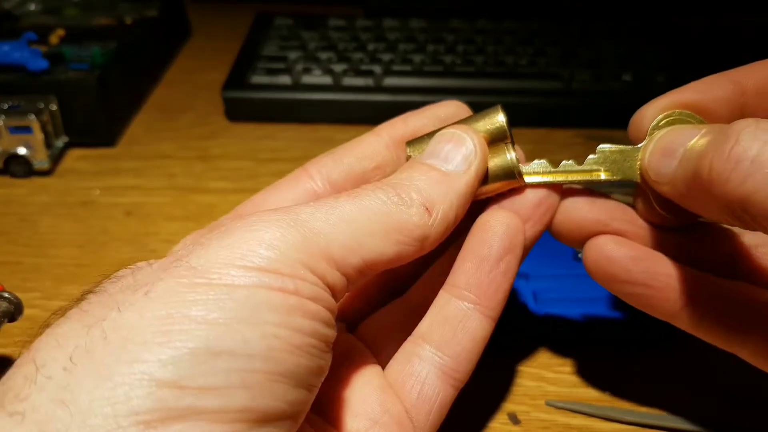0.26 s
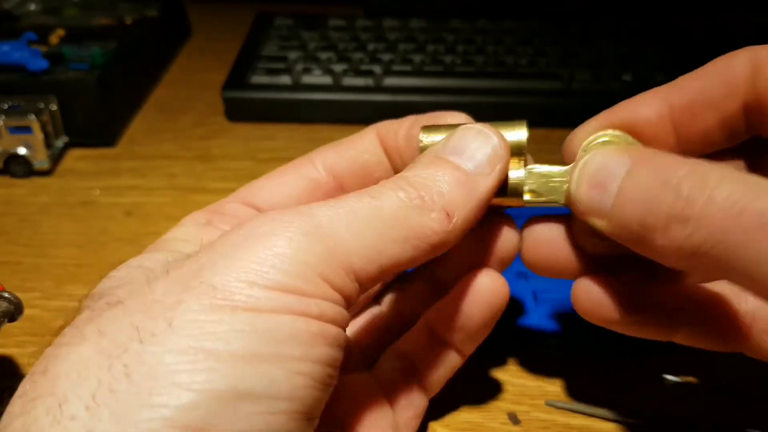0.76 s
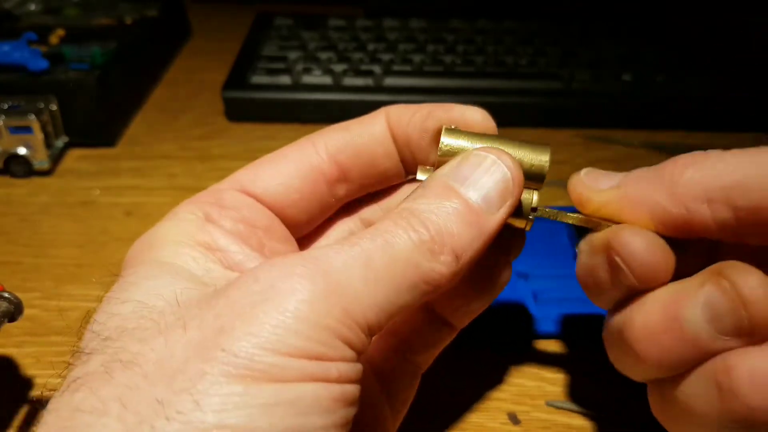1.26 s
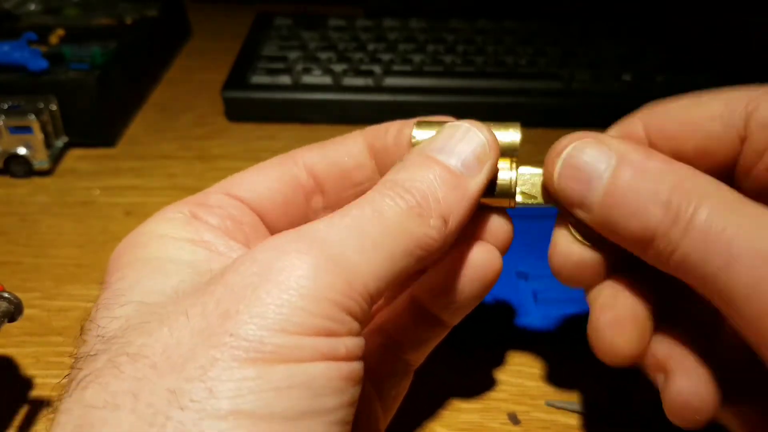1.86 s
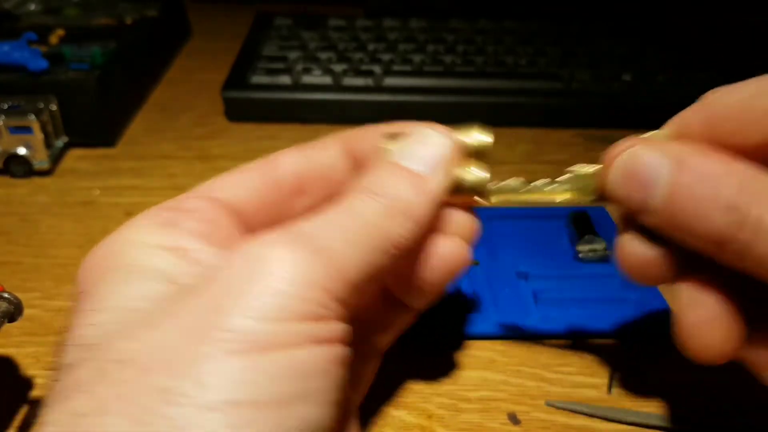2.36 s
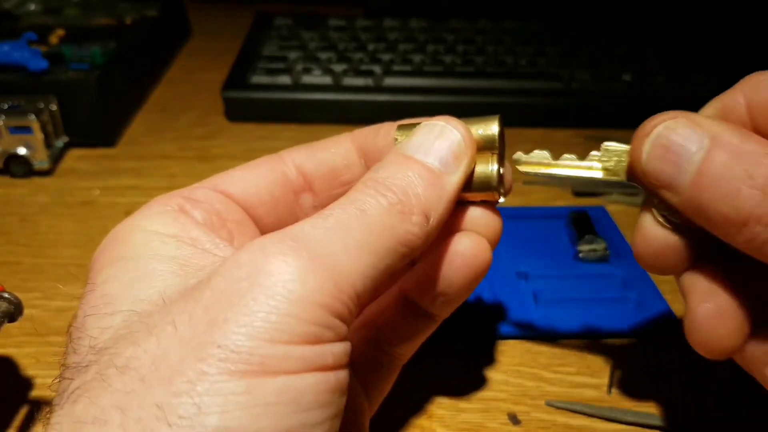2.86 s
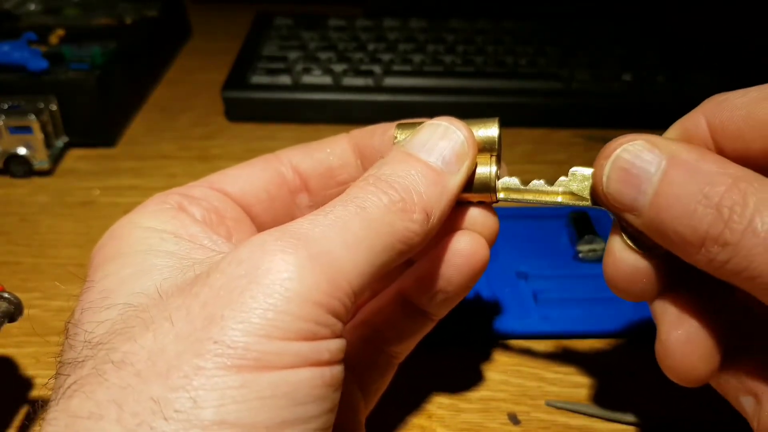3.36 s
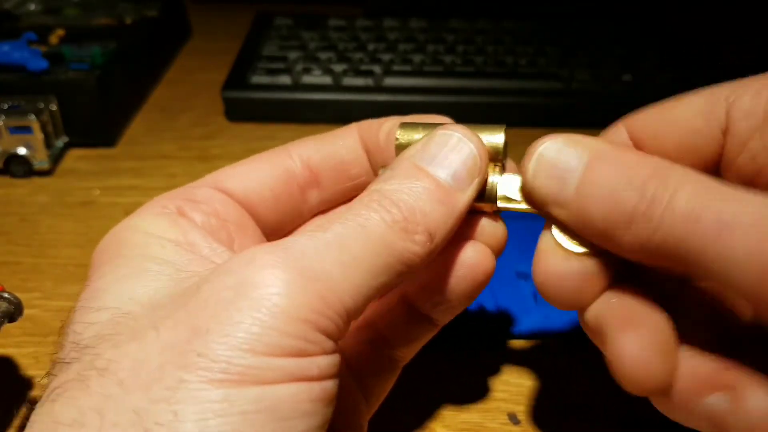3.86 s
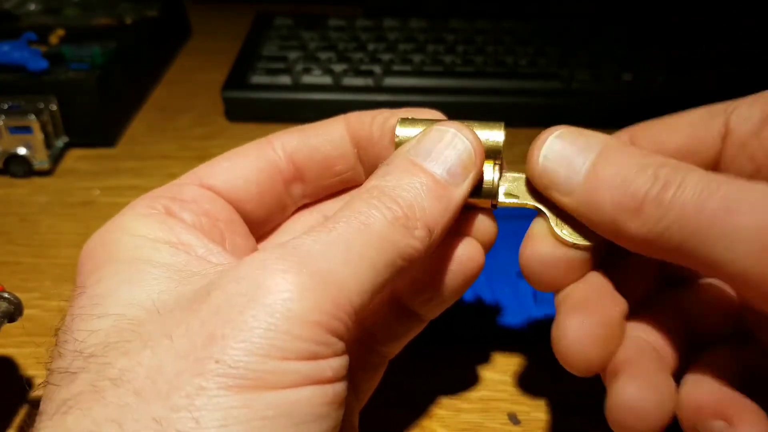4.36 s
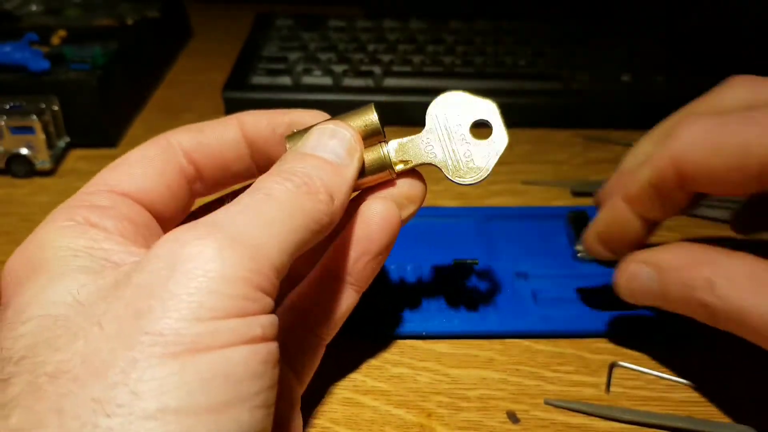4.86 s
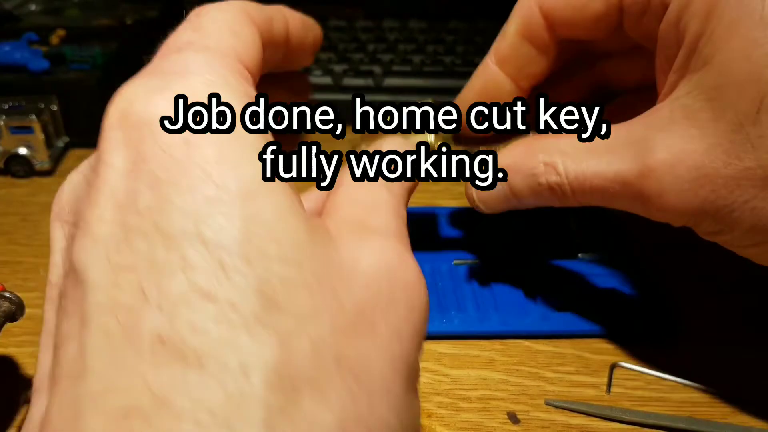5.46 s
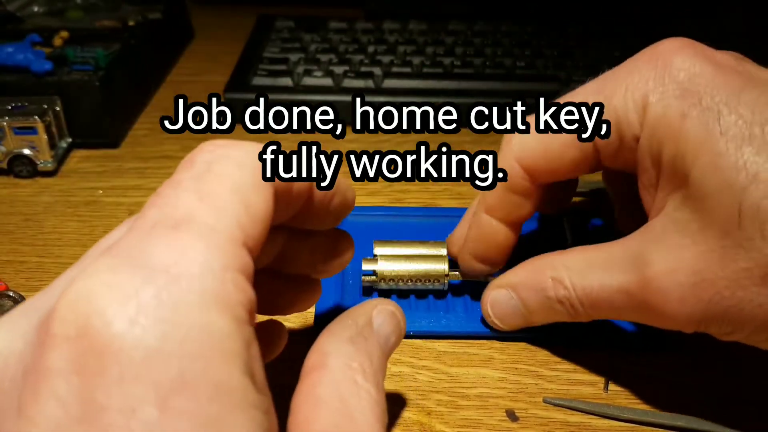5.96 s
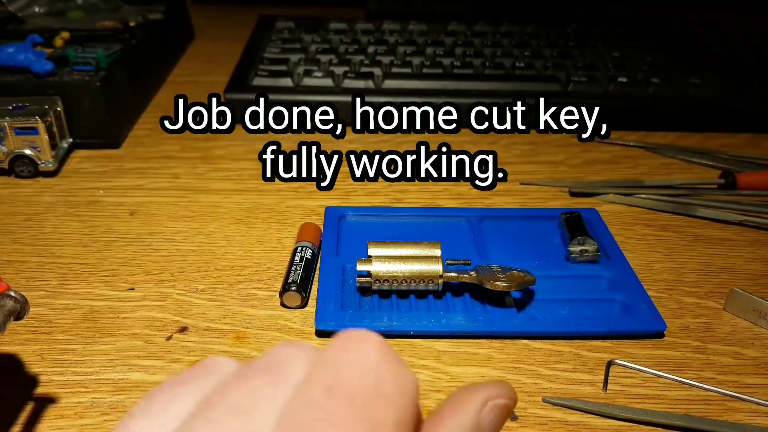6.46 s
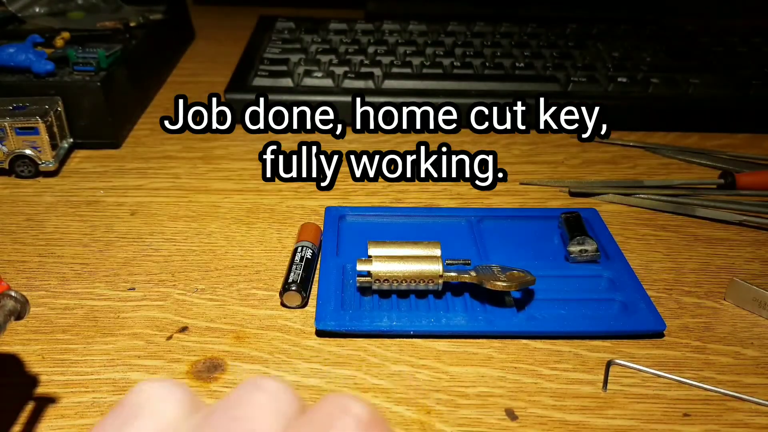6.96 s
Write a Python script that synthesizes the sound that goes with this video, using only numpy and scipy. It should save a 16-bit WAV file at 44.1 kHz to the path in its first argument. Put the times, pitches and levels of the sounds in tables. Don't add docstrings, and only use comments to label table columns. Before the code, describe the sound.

Dry, bright, gritty metal ticks, slightly left of centre: a key enters a cylinder, hits home sharply, turns with tiny clicks, rattles out over the pins, then repeats the insertion with an even sharper snap. Quiet loose-key jingles lead to a double knock on a hollow plastic tray, a wooden thud with a bright clack, and a final little tumble. A short room reflection answers the hits, above wavering low hum, soft bumps and hiss.

```python
import sys
import numpy as np
from scipy import signal
from scipy.fft import rfft, irfft
from scipy.io import wavfile
from scipy.ndimage import uniform_filter1d

SR = 44100
rng = np.random.default_rng(int(sys.argv[2]) if len(sys.argv) > 2 else 0)


def attenuation_scalar(level_db):
    decades = np.asarray(level_db, float) / 20
    return 10 ** decades


def unload_wav(signal):
    wavfile.write(
        sys.argv[1],
        SR,
        np.round(np.clip(np.atleast_2d(signal).T, -1, 1) * 32767).astype(np.int16),
    )


N = 317520

# (time [s], peak [dB], dullness [dB], chatter length [ms])
TOUCHES = [
    (.3016, -55.5, -4, 3.3),
    (.3153, -66, -18, 6),
    (.3282, -58, -4, 2.1),
    (.4114, -53, -7, 2.5),
    (.4196, -42.5, -13, 2),
    (.4707, -34.5, -14.5, 1.1),
]
# (time [s], peak [dB], dullness [dB], chatter length [ms])
FIRST_IN = [
    (.6591, -25.5, -22, 1.6),
    (.6614, -29, -30.5, 2),
    (.755, -40.5, -21, 2.3),
    (.7592, -28, -14.5, 5.1),
    (.7665, -26, -12.5, 1.1),
    (.7686, -17, -19.5, 2.3),
]
# (time [s], peak [dB], dullness [dB], chatter length [ms])
SEATED = [
    (.8725, -29, -15, 2.8),
    (.8768, -23, -15, 3),
    (.8845, -6.5, -14.5, 1.1),
    (.8865, -26, -18, 3.5),
    (3.7635, -29.5, -10, 4),
    (3.768, -23, -11.5, 1.8),
    (3.7737, -4, -10.5, 0.43),
    (3.7755, -18, -13, 3.5),
]
# (time [s], peak [dB], dullness [dB], chatter length [ms])
TURNS = [(1.2015, -45, -22.5, 4.3), (1.209, -46, -14, 3), (1.2184, -48, -5.5, 2.7), (1.339, -61, -14, 3.3),
         (1.4751, -51, -15.5, 1), (1.578, -47, -13, 2), (1.5817, -38.5, -10, 2.2), (1.588, -48.5, -8, 5.6),
         (1.7664, -56, 7, 3.4), (1.7777, -46, -7.5, 2.2), (1.7871, -52.5, 0, 7.1), (1.7939, -51, -11, 4.3),
         (1.8016, -44, -6, 2.4), (1.9853, -40, -11, 6.1), (1.9915, -34.5, -18.5, 0.86),
         (3.9587, -56, -2, 14), (3.9843, -39, -19, 2.6), (4.0078, -49.5, -5, 9.6), (4.1451, -57.5, -9, 2.8),
         (4.2095, -45.5, -6, 6.5), (4.2156, -42.5, -2, 3.7), (4.2237, -41.5, -10.5, 2.5),
         (4.229, -53, 8.5, 6), (4.377, -60.5, 3.5, 4.9), (4.3894, -59, -0.5, 14), (4.398, -47, -8.5, 6.6),
         (4.4854, -48, -13, 1.9), (4.491, -44.5, -11, 2.6)]
# (time [s], peak [dB], dullness [dB], chatter length [ms])
STOPS = [
    (1.4813, -36, -17, 1.6),
    (1.9154, -38.5, -15, 1.53),
    (4.1546, -39, -17.5, 1.6),
]
# (time [s], peak [dB], dullness [dB], chatter length [ms])
KEY_OUT = [(2.4236, -39.5, -16, 2.97), (2.4268, -41.5, -11, 2), (2.4299, -31.5, -8, 2.2),
           (2.435, -27.5, -16, 2.5), (2.4375, -30, -22, 2), (2.4395, -24, -9.5, 3.48),
           (2.4656, -26.5, -16.5, 2), (2.4719, -25, -27.5, 1.8), (2.4768, -22, -20, 2.2),
           (2.4828, -17.5, -20, 2.5), (2.488, -22, -24, 1.6), (2.4915, -28, -22, 3),
           (2.5025, -36, -18, 2.5)]
# (time [s], peak [dB], dullness [dB], chatter length [ms])
KEY_IN = [(3.173, -60, 6, 6.5), (3.249, -61, 4, 3.3), (3.2546, -54.5, -5.5, 4.3), (3.2703, -58, 3.5, 8.3),
          (3.2947, -60, 3.5, 11.5), (3.3075, -49.5, -20.5, 2.2), (3.3374, -55, -14, 4.5),
          (3.4305, -58.5, -11, 1.9), (3.6325, -29.5, -26, 2.7), (3.6352, -33.5, -11, 2.1),
          (3.6525, -23.5, -24, 2.6), (3.6548, -28.5, -18, 1.7), (3.668, -30.5, -18, 0.85),
          (3.67, -19.5, -16.5, 2.6)]
# (time [s], peak [dB], dullness [dB], chatter length [ms])
RATTLE = [(4.5966, -37.5, -20.5, 2.1), (4.6088, -46.5, -5, 7.7), (4.6753, -39.5, -13.5, 5.4),
          (4.6879, -35.5, -12.5, 1.14), (5.0649, -54, -15, 7.1), (5.1212, -51.5, -14, 12.3),
          (5.3893, -55, -18, 2.4), (5.4575, -53.5, -5, 2.3), (5.5464, -49.5, -3, 4.4),
          (5.5514, -51.5, -12.5, 3), (5.5561, -40.5, -12.5, 2.8), (5.56, -45, -10, 3),
          (5.571, -48, -11, 4.2)]
# (time [s], pitch [Hz], level [dB])
RINGS = [(.66, 5980, 5.5), (.7686, 12820, 8), (.7686, 2300, 4.5), (.8845, 8260, 7.5), (1.205, 3020, 16.5),
         (1.2184, 3000, 7), (1.5817, 4040, 10), (1.5817, 6070, 18), (1.7664, 2400, 17.5),
         (1.7777, 9400, 10), (1.8016, 7860, 14), (1.9915, 9400, 9), (2.4832, 4880, 11), (2.4832, 11100, 6),
         (3.632, 9740, 7), (3.67, 2400, 6), (3.67, 3996, 2.5), (3.67, 9430, 10), (3.7737, 750, 6),
         (3.7737, 9600, 5), (4.2156, 10100, 20), (4.2156, 744, 10.5), (4.49, 5030, 12)]
RING_HZ, RING_S = 330, 0.004

# (time [s], thud peak [dB], clack [dB], treble [dB], contact length [ms])
TRAY_KNOCKS = [(5.885, -37, -9, -6.5, 5.8), (5.891, -32, -4, -25, 2.8), (5.897, -36.5, -15.5, -8.5, 3.9),
               (5.912, -43, -32.5, -2, 4.6), (6.045, -50.5, -19, 0, 9.5), (6.07, -26, -11, -10.5, 5.4),
               (6.0828, -13.5, 3.5, 1.5, 1.4), (6.0845, -11.5, -4, -3.5, 2.2), (6.0875, -21, -11, -13, 2.2),
               (6.093, -24, -3.5, -12, 2), (6.101, -28.5, -10.5, -13.5, 3), (6.113, -27, -14, -14, 5.1),
               (6.144, -30.5, -14, -19.5, 4), (6.16, -35.5, -42, 2.5, 4.4), (6.195, -48, -3, -17.5, 6.4)]
# (time [s], thud peak [dB], clack [dB], treble [dB], contact length [ms])
CLACKS = [
    (6.585, -55, -10, -28, 9.5),
    (6.6195, -24.5, -7.5, -40, 1.3),
    (6.6225, -20, -16, -38, 4.1),
    (6.6355, -34.5, 25, 15, 2.5),
    (6.6388, -32.5, 17.5, 11.5, 1.14),
    (6.65, -40.5, 14, 8.5, 8.2),
    (6.665, -30.5, 10, -4, 3.7),
    (6.671, -26.5, -1, -9, 4.9),
    (6.68, -30.5, -13, -11.5, 2.6),
    (6.705, -36.5, 6, -6.5, 17),
]
# (time [s], thud peak [dB], clack [dB], treble [dB], contact length [ms])
TUMBLE = [(7.005, -37.5, 7.5, -12.5, 3.2), (7.012, -37, 15, -16, 8.9), (7.018, -39.5, 12, -15, 6.4),
          (7.033, -36.5, 3.5, -17, 5), (7.046, -40.5, 2, -16, 11), (7.058, -26, 5.5, 2, 3.1),
          (7.061, -26, 7, 2.5, 1.6), (7.07, -37, -5, 0, 4), (7.081, -36.5, -11, 3, 10),
          (7.1005, -43, -9, 12, 2.8), (7.104, -29.5, -19, 3, 2.3), (7.108, -24.5, 10.5, -30, 2.1),
          (7.113, -31, -4, -15, 3), (7.129, -26.5, -8, -31, 4.1), (7.143, -27.5, -17, -13, 3.5),
          (7.156, -30, -8, -25, 2.7), (7.164, -36.5, -11, 6.5, 4.3), (7.168, -33.5, 9, -8, 3.3),
          (7.187, -34, -5, -11, 4.5)]
# (time [s], pitch [Hz], level [dB])
SPOTS = [(5.891, 865, 0.5), (6.0845, 785, 7.5), (6.0875, 761, 0.5), (6.0845, 1250, -0.5),
         (6.6225, 875, 6.5), (6.6388, 3400, 6.5), (6.6388, 4730, 10), (7.018, 2610, 10), (7.061, 1400, 7.5),
         (7.108, 1020, 0.5), (7.168, 1440, 7), (7.058, 12500, -2), (7.061, 12300, -3), (7.1005, 12300, 12),
         (7.1005, 14000, 10), (7.104, 12300, 12), (7.164, 12500, 14.5), (7.164, 14300, 8),
         (7.168, 12800, 10), (6.65, 12700, 11), (6.665, 12700, 8), (6.6195, 1500, 9), (6.6195, 2000, 9.5),
         (6.6195, 1200, 4)]
SPOT_HZ, SPOT_SHARE = 149.9, 0.079
CRACK_SHARE, CRACK_DB = 0.72, 0

# (pitch [Hz], width [Hz], level [dB])
BRASS = [(2500, 420, -1.5), (3677, 780, -0.5), (6250, 1300, 4), (9300, 310, -4.5), (10800, 670, -6),
         (13900, 260, 8)]
# (pitch [Hz], width [Hz], level [dB])
BARREL = [(741, 140, 6.5), (1600, 340, -1.5)]
# (pitch [Hz], width [Hz], level [dB])
PLUG = [(2700, 810, -4), (4000, 1400, 8), (5750, 620, 8.5), (9130, 1260, 9), (11600, 740, -5),
        (14140, 420, 3.5)]
# (pitch [Hz], width [Hz], level [dB])
STOP_RING = [(4000, 940, 16.5), (5150, 900, 4), (8610, 880, 11), (9600, 720, 10), (10700, 600, 0.5),
             (14300, 800, 0)]
# (pitch [Hz], width [Hz], level [dB])
FACE = [(1520, 76, 18), (3004, 210, -5), (9600, 510, -1), (13000, 1500, 1.5)]
# (pitch [Hz], width [Hz], level [dB])
KEY_BOW = [(3250, 378, -2), (4570, 520, 5), (5760, 400, 8), (11700, 900, 0), (13570, 570, 5)]
# (pitch [Hz], width [Hz], level [dB])
TRAY = [(235, 31, 15), (345, 15, 6.7), (465.3, 46, 9.5), (579, 53, 4.6), (686, 46, 5.1), (790.6, 61, 8),
        (1120, 72, 4.6), (1317, 240, 3), (2110, 140, 2), (2464, 200, -2), (2680, 200, 3.6), (3424, 340, 3),
        (4565, 570, 3)]
# (pitch [Hz], width [Hz], level [dB])
BLOCK = [(851, 56, 8.5), (1027, 84, 7.5), (1482, 83, 3), (1805, 140, 0), (2110, 54, -4), (2830, 100, 2.5),
         (3315, 190, 8), (3650, 130, 3.5), (4200, 120, 5.5), (4620, 230, 6), (5270, 87, -7)]
# (pitch [Hz], width [Hz], level [dB])
TOOL = [(460, 48, 15.5), (635, 43, 3.5), (920, 97, 1.5), (1083, 130, 6), (1400, 140, 3.5), (2585, 100, 8.5),
        (2940, 120, 6), (4163, 340, 3), (5220, 220, 0.5), (6650, 220, -3)]
WANDER_DB, BODY_PER_DB = 4, -0.2413
DIP_HZ, DIP_OCTAVES, DIP_DB = 7140, 0.39, -3.5

# (pitch [Hz], level [dB], T60 [s])
BOARDS = [(95, -6.5, 0.23), (136.5, 2.5, .55), (240, -7.5, 0.18), (335, -8, 0.63), (458, -8.5, .4)]
# (time [s], level [dB])
BOARD_BLOWS = [
    (5.904, -44),
    (6.09, -31.5),
    (6.63, -45.5),
    (7.058, -57),
]
BOARD_RISE_S = 0.025
# (time [s], level [dB], hold [s])
SHAKES = [
    (5.908, -31, 0.0057),
    (6.09, -33, 0.079),
    (6.64, -35.5, 0.009),
    (7.08, -40.5, 0.083),
]
SHAKE_RISE_DB_S, SHAKE_FALL_DB_S = 600.5, 148.5
# (frequency [Hz], density [dB per Hz])
SHAKE_COLOUR = [(80, -4), (105, 1), (124, -4), (138, 7), (154, -19.5), (232, -1.5), (290, -17), (335, 0),
                (400, -9.5)]

# (frequency [Hz], T60 [s])
ROOM_T60 = [(150, 0.7), (500, 0.36), (1400, 0.36), (3700, 0.29), (9000, 0.2), (15000, 0.23)]
# (frequency [Hz], level [dB])
ROOM_COLOUR = [(150, 1), (500, -4), (1400, 0.5), (3700, 0.5), (9000, 2), (15000, -2.5)]
ECHO_GRAIN_DB = 2.5
RING_SHARE = 0.4

# (time [s], level [dB], hold [s])
SCRAPE = [
    (3.05, -70, 0.0064),
    (3.15, -63, 0.011),
    (3.258, -63, 0.035),
]
SCRAPE_RISE_DB_S, SCRAPE_FALL_DB_S = 600, 215
# (frequency [Hz], density [dB per Hz])
SCRAPE_COLOUR = [(1900, -3.5), (2200, 1), (2450, -2.5), (2800, -15.5)]
# (time [s], level [dB], hold [s])
BUMPS = [(.08, -57, 0.0086), (.77, -45.5, 0.0051), (.88, -39, 0.0031), (1.55, -59, 0.011),
         (1.94, -54.5, 0.012), (2.43, -36.5, 0.051), (2.81, -55, 0.012), (3.59, -52.5, 0.09),
         (3.69, -45, 0.12), (4.13, -52.5, 0.02), (4.6, -49.5, 0.096), (5.17, -52.5, 0.02),
         (5.29, -52.5, 0.025), (5.55, -54, 0.15)]
BUMP_REST_DB, BUMP_RISE_DB_S, BUMP_FALL_DB_S = -64.5, 503, 351
# (frequency [Hz], density [dB per Hz])
BUMP_COLOUR = [(44, -27.5), (75, -3.5), (113, 1), (296, -15), (344, -24), (373, -20.5), (500, -25),
               (650, -56), (1100, -120)]
# (time [s], level [dB], hold [s])
JOLTS = [
    (.42, -67, .02),
    (.85, -63, 0.054),
    (2.38, -57.5, 0.028),
    (2.63, -61.5, 0.05),
    (3.69, -55, 0.072),
    (4.6, -48, 0.048),
    (5.17, -59, 0.029),
    (5.62, -52, 0.012),
]
JOLT_REST_DB, JOLT_RISE_DB_S, JOLT_FALL_DB_S = -73, 293, 150.5
# (frequency [Hz], density [dB per Hz])
JOLT_COLOUR = [(22, 3), (35, 2), (52, -12)]
# (time [s], level [dB], hold [s], pitch [Hz])
HUM = [(0.09, -52.5, 0.013, 58.46), (0.257, -55, 0.014, 62.96), (0.743, -49.5, 0.043, 63.41),
       (0.965, -50.5, 0.033, 65.1), (1.234, -49.5, 0.026, 61), (1.366, -53, 0.052, 64.69),
       (1.673, -49, 0.3, 65.45), (2.125, -48, 0.044, 60.13), (2.478, -49, 0.055, 61.78),
       (2.729, -50.5, 0.47, 61.39), (3.433, -48, 0.41, 62.85), (3.976, -47, .47, 63.63),
       (4.65, -56, 0.44, 64.34), (5.492, -58, 0.07, 64.16), (6.169, -55, 0.016, 62.66),
       (6.439, -53.5, 0.23, 68.66), (7.07, -48.5, 0.065, 67.74)]
HUM_REST_DB, HUM_RISE_DB_S, HUM_FALL_DB_S = -61, 131, 131
# (frequency [Hz], density [dB per Hz])
FLOOR = [(12, -34), (20, -13), (80, -1), (106, -6), (195, -18), (280, -18), (391, -33.5), (805, -30.5),
         (1220, -36), (1850, -31.5), (3140, -45), (5040, -45), (7640, -49), (11000, -37), (15300, -35.5)]
FLOOR_DB = -57

# (start [s], end [s], top [Hz])
DULLED = [
    (6.1, 6.15, 14600),
    (6.65, 6.72, 15000),
    (7.057, 7.074, 13000),
    (7.074, 7.12, 14600),
    (7.147, 7.162, 12500),
    (7.172, 7.186, 14500),
]
TOP_HZ, PEAK = 15400, 0.9
LEFT_LEAN = attenuation_scalar(np.array([[0.8], [-0.8]]))


def pins():
    return (ticks(KEY_IN, BRASS, body_db=-1.0, left_db=6.0, vary_db=-2.5)
            + ticks(SEATED, BRASS + BARREL, body_db=-1.5, left_db=1.5, vary_db=3.5, wander_db=-1.0)
            + ticks(TURNS, PLUG, body_db=5.5, left_db=4.5, vary_db=6.5)
            + ticks(KEY_OUT, BRASS + BARREL, body_db=4.5, left_db=3.0, vary_db=1.5)
            + ticks(RATTLE, KEY_BOW, body_db=-1.5, left_db=6.0, vary_db=0.0)
            + ticks(STOPS, STOP_RING, body_db=-1.5, left_db=4.5, vary_db=3.0)
            + ticks(TOUCHES, FACE, body_db=-4.5, left_db=4.5, vary_db=-0.5)
            + ticks(FIRST_IN, BRASS, body_db=-7.0, left_db=3.0, vary_db=7.5))


def ticks(events, modes, body_db, left_db, vary_db, wander_db=WANDER_DB):
    def colour_db(hz, row):
        time, peak_db, dullness_db = row[:3]
        octaves = np.log2((hz + 1) / DIP_HZ)
        dip = DIP_DB * np.exp(-(octaves / DIP_OCTAVES) ** 2)
        middle = (dullness_db + 3) * (1 - above(hz, 10000, 5.4))
        low = (body_db + BODY_PER_DB * (peak_db + 40)) * (1 - above(hz, 2000, 6))
        ring = sum(db * np.exp(-((hz - f) / RING_HZ) ** 2)
                   for s, f, db in RINGS if abs(s - time) < RING_S)
        return ring + middle + low + dip - 10 * (1 - above(hz, 250, 2.3))

    pan_db = left_db + wander_db * rng.standard_normal(len(events))
    return strike(events, colour_db, pan_db, modes, (2500, 16000), rise=0.3, fall=0.77, grit_db=7.0,
                  vary_db=vary_db, even_hz=1491, push_hz=1500, alike_hz=2556, lag_s=0.0001,
                  blur_hz=1800, size=2048, lead=700)


def knocks():
    return (blows(TRAY_KNOCKS, TRAY, left_db=4.0, top_db=3.5, top_hz=13000, vary_db=-1.5)
            + blows(CLACKS, BLOCK, left_db=4.5, top_db=-7.5, top_hz=12700, vary_db=2.5)
            + blows(TUMBLE, TOOL, left_db=3.5, top_db=-11.5, top_hz=13700, vary_db=-1.0))


def blows(events, modes, left_db, top_db, top_hz, vary_db):
    def colour_db(hz, row):
        time, _, clack_db, treble_db = row[:4]
        crack_db = clack_db + CRACK_SHARE * (treble_db - clack_db) + CRACK_DB
        db = (clack_db - 2.5) * above(hz, 1000, 8)
        db = db + (crack_db - clack_db - 6) * above(hz, 2400, 8)
        db = db + (treble_db - crack_db - 2) * above(hz, 5300, 6)
        db = db + sum(g * np.exp(-((hz - f) / max(SPOT_HZ, SPOT_SHARE * f)) ** 2)
                      for s, f, g in SPOTS if abs(s - time) < RING_S / 2)
        tilt = top_db * above(hz, top_hz, 4.9) - 7 * above(hz, 6400, 2.5)
        return db + tilt - 14 * (1 - above(hz, 407.3, 2.01))

    pan_db = np.full(len(events), left_db)
    return strike(events, colour_db, pan_db, modes, (400, 1000), rise=0.025, fall=1.0, grit_db=7.0,
                  vary_db=vary_db, even_hz=341.6, push_hz=253.5, alike_hz=1812, lag_s=0.00027,
                  blur_hz=600, size=8192, lead=400)


def strike(events, colour_db, pan_db, modes, band_hz, rise, fall, grit_db, vary_db, even_hz, push_hz,
           alike_hz, lag_s, blur_hz, size, lead):
    out = np.zeros((2, 2, N + 2 * size))
    hz = np.arange(size // 2 + 1) * SR / size
    ms = (np.arange(size) - lead) * 1000 / SR
    bins_per_hz = size / SR
    push = np.exp(-2j * np.pi * hz * lead / SR)
    in_band = above(hz, band_hz[0], 8) * (1 - above(hz, band_hz[1], 8))
    for row, pan in zip(events, pan_db):
        force = np.exp(np.where(ms < 0, ms / rise, -ms / fall) / max(row[-1], 0.5))
        chance = rng.standard_normal((3, size))
        hit = rfft(force * chance[:2] * attenuation_scalar(grit_db * chance[2]))
        hit = hit / np.sqrt(uniform_filter1d(np.abs(hit) ** 2, int(even_hz * bins_per_hz)))
        gritty = above(hz, push_hz, 3)
        hit = hit * gritty + push * (1 - gritty)
        body = 1
        for (f, width, db), c in zip(modes, chance[2]):
            damping = 1j * width * hz
            body = body + attenuation_scalar(db + vary_db * c) * damping / (f * f - hz ** 2 + damping)
        hit = ports(hit, hz, alike_hz, 0.33, lag_s) * body * attenuation_scalar(colour_db(hz, row))
        core = irfft(hit * in_band, size)
        peak = np.sqrt(2 * uniform_filter1d(core ** 2, 40).max(axis=1, keepdims=True))
        blurred = np.sqrt(np.abs(uniform_filter1d(np.abs(hit) ** 2, int(blur_hz * bins_per_hz))))
        around = RING_SHARE * hit + push * blurred
        level = attenuation_scalar(row[1] + np.array([[pan], [-pan]]) / 2)
        at = int(row[0] * SR) + size - lead
        out[..., at:at + size] += irfft(np.array([hit, around]), size) / peak * level
    return out[..., size:size + N]


def desk():
    s, blow_db = np.transpose(BOARD_BLOWS)
    t = np.maximum(np.arange(N) / SR - s[:, None], 0)
    ring = sum(attenuation_scalar(db - 60 * t / t60) * np.sin(2 * np.pi * hz * t) for hz, db, t60 in BOARDS)
    ring = ring * (1 - np.exp(-t / BOARD_RISE_S))
    shake = swells(SHAKES, SHAKE_RISE_DB_S, SHAKE_FALL_DB_S) * attenuation_scalar(-5.5) * noise(SHAKE_COLOUR, 600)
    return (shake + attenuation_scalar(blow_db) @ ring) * LEFT_LEAN


def room(x, wet_db, build_s):
    size = SR // 2
    t = np.arange(size) / SR
    hz = np.arange(size // 2 + 1) * SR / size
    tail = 0
    for f in 125 * 2.0 ** np.arange(8):
        octave = np.exp(-np.log2((hz + 1) / f) ** 2) * (hz < TOP_HZ)
        band = irfft(ports(rfft(rng.standard_normal((2, size))), hz, 590) * octave, size)
        tail = tail + band * attenuation_scalar(on_log(f, ROOM_COLOUR) - 60 * t / on_log(f, ROOM_T60))
    build = 1 - np.exp(-(t / build_s) ** 2)
    tail = tail * build * attenuation_scalar(ECHO_GRAIN_DB * walk(400)[:size])
    return attenuation_scalar(wet_db) * signal.fftconvolve(x, tail / np.sqrt(SR / 100), axes=1)[:, :N]


def scrape():
    gain = swells(SCRAPE, SCRAPE_RISE_DB_S, SCRAPE_FALL_DB_S) * attenuation_scalar(1.3 * walk(40))
    return gain * noise(SCRAPE_COLOUR, 1500)


def handling():
    thud = swells(BUMPS, BUMP_RISE_DB_S, BUMP_FALL_DB_S, BUMP_REST_DB) * attenuation_scalar(1.1 * walk(5.7) - 2.5)
    deep = swells(JOLTS, JOLT_RISE_DB_S, JOLT_FALL_DB_S, JOLT_REST_DB) * attenuation_scalar(1.0 * walk(3.4) + 1.0)
    return thud * noise(BUMP_COLOUR, 700) + deep * noise(JOLT_COLOUR, 400)


def hum():
    s, db, hold, hz = np.transpose(HUM)
    pitch = np.interp(np.arange(N) / SR, s + hold / 2, hz)
    phase = 2 * np.pi * np.cumsum(pitch + 0.99 * walk(3.9)) / SR
    gain = swells(zip(s, db, hold), HUM_RISE_DB_S, HUM_FALL_DB_S, HUM_REST_DB) * attenuation_scalar(1.5 * walk(22))
    return np.sqrt(2) * gain * np.sin(phase + np.array([[0], [0.15]]))


def hiss():
    return attenuation_scalar(FLOOR_DB + 0.25 * walk(2.7)) * noise(FLOOR, 500)


def swells(events, rise_db_s, fall_db_s, rest_db=-110):
    t = np.arange(N) / SR
    db = [level - rise_db_s * np.maximum(s - t, 0) - fall_db_s * np.maximum(t - s - hold, 0)
          for s, level, hold in events]
    return attenuation_scalar(np.maximum(np.max(db, axis=0), rest_db))


def noise(colour, alike_hz):
    hz = np.arange(N // 2 + 1) * SR / N
    inside = above(hz, colour[0][0], 8) * (1 - above(hz, 1.01 * colour[-1][0], 60))
    spectra = ports(rfft(rng.standard_normal((2, N))), hz, alike_hz)
    x = irfft(spectra * attenuation_scalar(on_log(hz, colour)) * inside, N)
    return x / x.std()


def ports(spectra, hz, alike_hz, most=0.97, lag_s=0.0):
    side = np.sqrt(above(hz, alike_hz, 2) * np.clip(most, 0, 0.5))
    mid = np.sqrt(1 - side ** 2)
    late = np.exp(-2j * np.pi * hz * lag_s)
    left = mid * spectra[0] + side * spectra[1]
    right = mid * spectra[0] - side * spectra[1]
    return np.array([left, right * late])


def walk(rate):
    k = int(SR / rate)
    held = np.repeat(rng.standard_normal(N // k + 1), k)
    return uniform_filter1d(uniform_filter1d(held, k), k)[:N]


def on_log(hz, table):
    f, v = np.transpose(table)
    return np.interp(np.log(hz + 1e-9), np.log(f), v)


def above(hz, edge_hz, steep):
    return 1 / (1 + (edge_hz / (hz + 1e-9)) ** steep)


def scene():
    clicks, clicks_out = pins()
    thumps, thumps_out = knocks()
    drier_db = 3.7 * (abs(np.arange(N) / SR - 2.46) < 0.08)
    walls = room(clicks_out * attenuation_scalar(-drier_db), -12.5, 0.0075) + room(thumps_out, -10.5, 0.0055)
    background = (hiss() + handling() + scrape() + hum()) * LEFT_LEAN
    return clicks + thumps + walls + desk() + background


def dull_clatter(x):
    t = np.arange(N) / SR
    for start, end, hz in DULLED:
        gate = uniform_filter1d(1.0 * ((t > start) & (t < end)), size=90)
        lowpass = signal.butter(10, hz, fs=SR, output="sos")
        x = x - gate * (x - signal.sosfiltfilt(lowpass, x))
    return x


def band_limit(x):
    return signal.sosfilt(signal.butter(12, 16620, fs=SR, output="sos"), x)


def record(dry):
    lowpass = signal.ellip(6, 0.2, 22, TOP_HZ, fs=SR, output="sos")
    cut = signal.sosfilt(lowpass, dry)
    mix = dull_clatter(np.clip(cut, -PEAK, PEAK))
    return band_limit(mix)


dry = scene()
out = record(dry)
unload_wav(out)
```